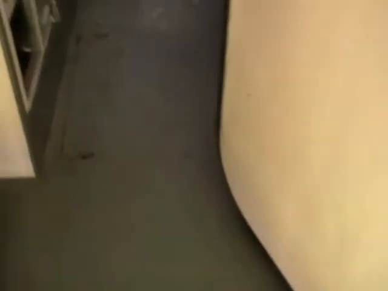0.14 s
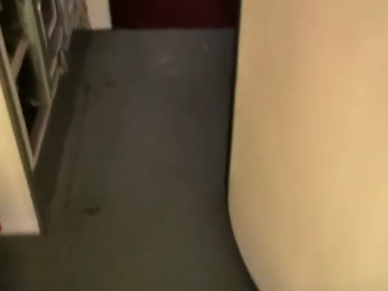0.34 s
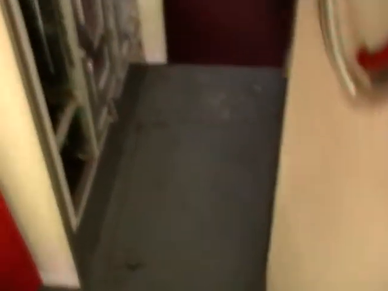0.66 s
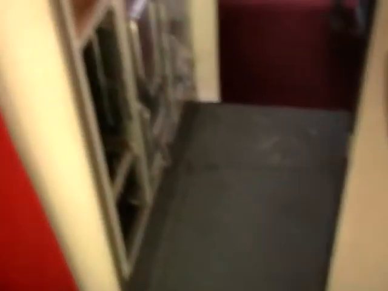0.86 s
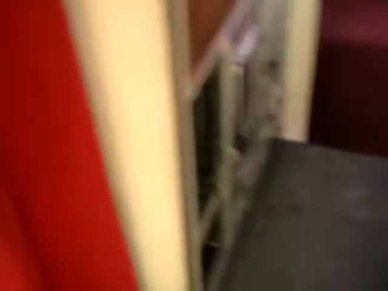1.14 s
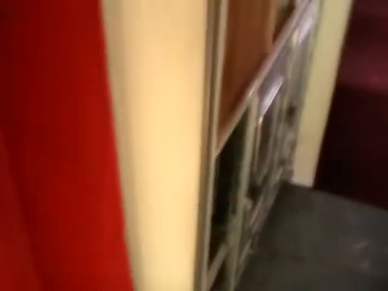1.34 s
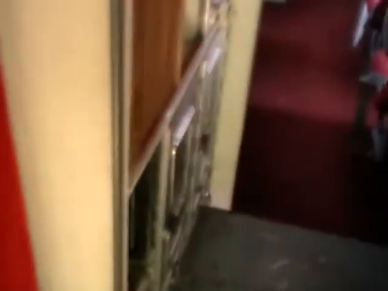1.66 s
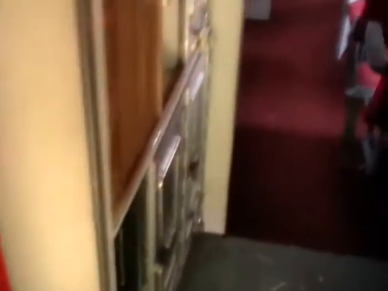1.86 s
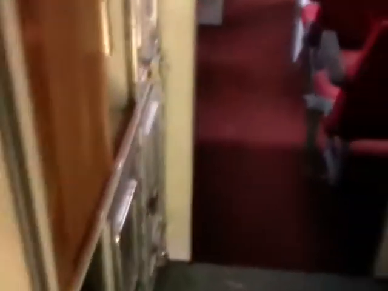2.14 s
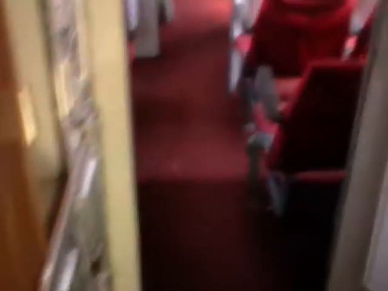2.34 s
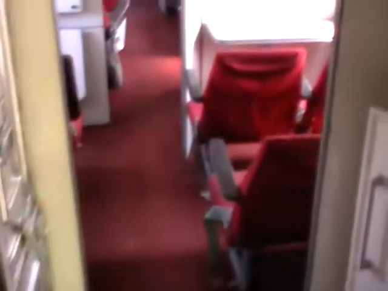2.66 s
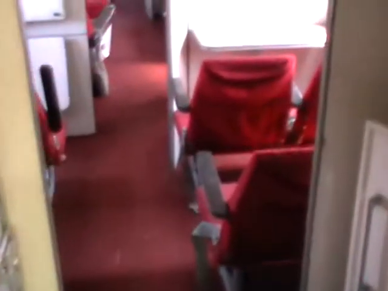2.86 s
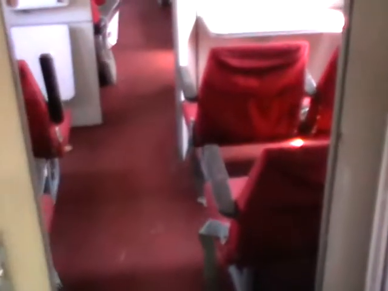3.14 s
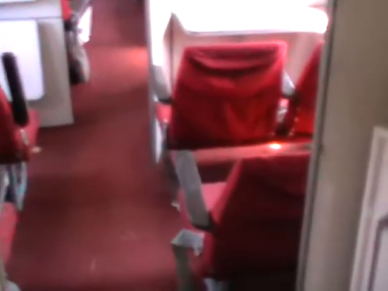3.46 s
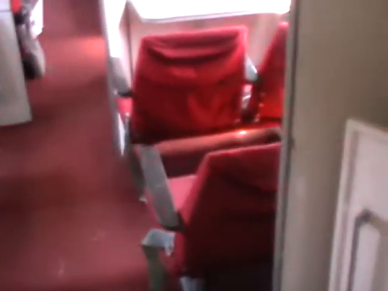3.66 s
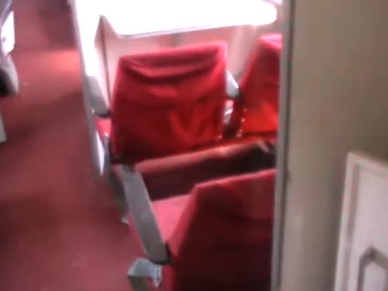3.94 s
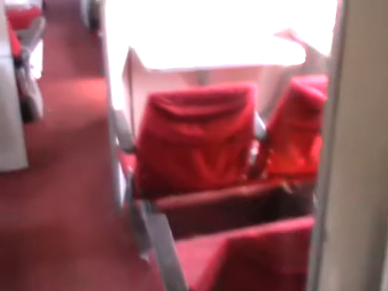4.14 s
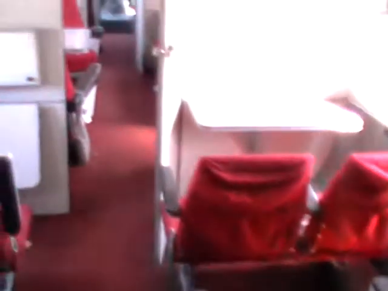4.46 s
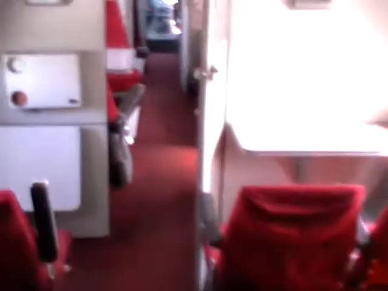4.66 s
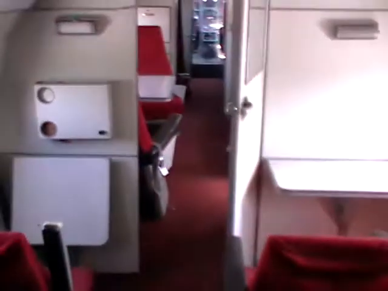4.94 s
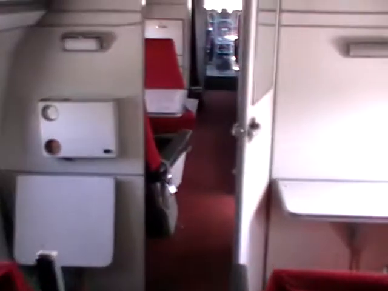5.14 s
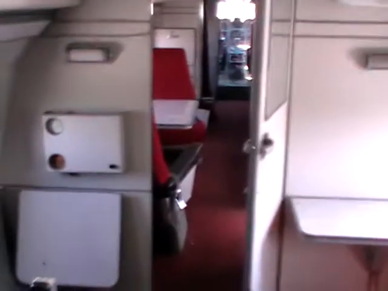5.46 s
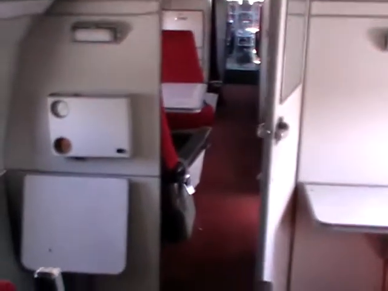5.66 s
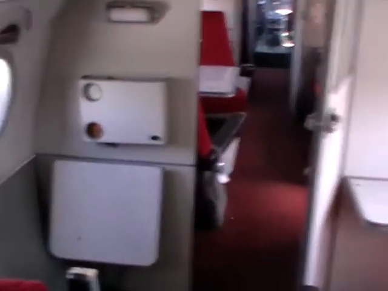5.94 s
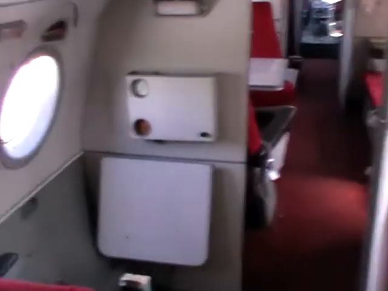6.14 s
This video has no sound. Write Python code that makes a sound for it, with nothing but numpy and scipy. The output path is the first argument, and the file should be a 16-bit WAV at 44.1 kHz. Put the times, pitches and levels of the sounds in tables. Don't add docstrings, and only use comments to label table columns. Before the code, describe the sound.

Someone walks through a small padded aircraft cabin, heels thumping hollow floor panels, one loud metallic bang on a trolley, then soft carpet scuffs and squeaks.

```python
import sys
import numpy as np
from scipy import signal
from scipy.fft import rfft, irfft, next_fast_len
from scipy.io import wavfile
from scipy.ndimage import uniform_filter1d, map_coordinates

SR = 44100
rng = np.random.default_rng(int(sys.argv[2]) if len(sys.argv) > 2 else 0)


def nominal_scale(level):
    x = np.asarray(level, float) / 20
    return 10 ** x


def file_out(sig):
    cols = np.atleast_2d(sig).T
    lim = np.clip(cols, -1, 1)
    pcm = np.round(lim * 32767).astype(np.int16)
    wavfile.write(sys.argv[1], SR, pcm)


N = 278271

# start_s, ring_db, thud_db, clap_db, attack_ms
BLOWS = [(0.318, -8.5, -15, -28, 11.4), (1.0934, -1, -8, -3.5, 1.3), (1.453, -13.5, -20.5, -36, 2.8),
         (2.393, -28, -43.5, -42, 4.5), (2.838, -11, -15, -40.5, 1.2), (2.922, -12, -20.5, -44, 2.2),
         (3.6233, -20.5, -23, -36, 0.7), (4.676, -23.5, -26, -49, 0.97), (5.631, -21, -26.5, -57.5, 0.82),
         (5.692, -33, -34, -39, 3.5), (5.7253, -18.5, -27, -43, 1.4)]
# start_s, ring_db, thud_db,
# clap_db, attack_ms
REBOUNDS = [(.336, -17, -28, -50, 2), (1.468, -29, -38, -50, 2), (2.94, -27, -40, -55, 3.3),
            (3.694, -33, -34, -58, 1.5), (4.878, -33, -43, -60, 2.7), (5.641, -28, -41, -61, 2),
            (1.097, -7, -30, -40, 2), (1.118, -16.5, -30, -28, 9.3), (.352, -24.5, -40, -60, 4),
            (.398, -22, -50, -65, 6), (3.022, -36, -55, -75, 5), (3.062, -33, -55, -69, 4.2),
            (3.118, -34.5, -55, -70, 3.1), (6.5, -41, -55.5, -75, 3.7), (0.73, -31, -43, -65, 5.5)]
# pitch_hz, level_db, t60_s
GALLEY = [(109, -14.5, 0.25), (233.4, 8.5, 0.1), (369.5, -1.5, 0.1), (459, -12, 0.21), (550, 2.5, 0.079),
          (720, -8.5, 0.11), (990, -37.5, .15), (1385, -12, .05), (1150, -22, .05)]
# pitch_hz, level_db, t60_s
TROLLEY = [(60, -20, 0.49), (87, -12.5, 0.7), (112.2, -8.5, 0.33), (151, -14, 0.42), (208, 0, 0.082),
           (232, -4.5, 0.052), (263.3, -6, 0.051), (311, -2.5, .05), (376, -5.5, 0.069),
           (565, -8.5, 0.17), (620.7, 2, 0.09), (788, -7.5, .14), (832, -10, 0.084), (1094, -13.5, 0.1),
          (1190, -11.5, 0.13), (1388, -14, 0.068), (1540, -8, 0.11), (1664, -14, .15), (1760, -5, 0.1),
          (2200, -13, 0.044), (2600, -14.5, 0.05), (3136, -9, 0.055), (3460, -13, 0.039)]
# pitch_hz, level_db, t60_s
PANELS = [GALLEY, TROLLEY, [(205, -1.5, 0.15), (547, -12, 0.29), (720, -24, 0.29), (323, 4, 0.05)],
          [(732, 7, 0.031), (1000, -4, 0.025), (1300, -3, 0.03)], [(150.8, 1, 0.19), (320, -6.5, 0.074),
          (447, -1, 0.046), (560, -6, 0.062), (895, -13.5, 0.06), (1360, -23, 0.19)], [(159.6, 9.5, 0.049),
          (159, -12, 0.22), (550, -16, 0.12), (270, -2.5, 0.095), (1450, -10.5, 0.042), (860, -18, .05),
          (1700, -20, .04)], [(337, 7.5, 0.034), (478, 0.5, 0.073), (560, -11.0, 0.11), (1190, 6.5, 0.021),
          (1470, -2.5, 0.055), (2120, -21, 0.17)] + [(106.0, -9.0, 0.17), (193, -6.5, 0.12)],
          [(96, -2, 0.32), (160.2, -1.5, 0.38), (213, 6, 0.074), (317, 3, 0.099), (410, -3.5, 0.16)],
          [(147, -23.5, 0.43), (460, 7.5, 0.033), (582, -5.5, 0.093), (1100, -7.5, 0.078)], [(560, 5, 0.1),
          (900, -5, 0.05)], [(338, -12, 0.082), (550, 1, 0.036), (833, 1, 0.045), (1294, -7.5, 0.099),
          (1550, -12, 0.087)]]
# pitch_hz, level_db, t60_s
LOOSE_PARTS = [
    [(224.5, -3, .25), (367, -10, 0.14), (600, -10, 0.17)],
    [(208, -1, .09), (424, -11, 0.055)],
    [(165, -4, .15), (300, -7, .1), (505, -8, .1)],
    [(200, -5, 0.13), (426, 3, .05), (704, -4, 0.044)],
    [(130, 2.5, 0.13), (300, -8, .08)],
    [(472, -2, .07), (800, -4, 0.055)],
    [(840, -4, .07), (910, -3, .08), (982, 0, 0.14)],
    [(1193, -3, .14), (1450, 0, .1), (2110, -5, .14), (2410, -8, .12), (3122, -10, .14)],
    [(362, -2, 0.13), (596, 0, .07), (716, -4.5, .15), (956, -14, 0.074)],
    [(230, -5, 0.0545), (330, 4, .05)],
    [(162, 2, .12), (300, -8, .05)],
    [(163, 6, 0.12), (260, -5, 0.07)],
    [(159.6, 1.5, 0.28), (300, -3.5, .06)],
    [(165, -0.5, .2), (486, 1.5, .05)],
    [(273, -1, 0.082), (550, -3, 0.069), (855, -7, .05)],
]
# pitch_hz, skew_radians
PORT_SKEW = [(60, .12), (400, .2), (2000, .3)]
# pitch_hz, left_over_right_db
LEAN = [(100, -1.7), (400, -0.5), (800, 1.9), (1500, 1.5), (3000, 0.5)]
# start_s, peak_db, pitch_hz, t60_ms
CLICKS = [(0.3239, -18, 5700, 20), (0.32, -29, 4700, 176), (1.4585, -38, 4200, 12), (2.313, -38, 2600, 21),
          (2.6025, -35, 745, 6), (2.671, -35, 2350, 30), (2.672, -37.5, 690, 46), (2.754, -44.5, 4500, 20),
          (2.783, -37, 3800, 20), (2.8397, -17, 900, 12), (3.3334, -25, 5500, 8), (3.6428, -25, 4300, 11.5),
          (1.0953, -9.5, 6500, 32), (4.055, -46, 4800, 12), (4.281, -36, 5000, 8.5), (5.128, -44, 4500, 12),
          (5.729, -23, 1100, 26), (1.3493, -30, 5030, 10), (1.41, -21, 3800, 8.6), (3.3982, -32, 2600, 20),
          (3.5912, -37, 5500, 8), (3.696, -31.5, 900, 17)]
# start_s, peak_db, pitch_hz, t60_ms
KNOCKS = [(0.37, -40, 1300, 27), (1.3313, -26.5, 1000, 33), (1.4715, -32, 2000, 45),
          (1.6435, -36, 4800, 28), (2.604, -41, 1710, 39), (2.8425, -25, 2390, 25), (2.185, -28, 800, 30),
          (2.195, -30, 560, 37), (2.411, -37.5, 745, 35), (2.94, -35, 1300, 25), (3.34, -26, 9600, 9),
          (3.3434, -26.5, 8300, 10), (3.3983, -31, 2360, 41), (3.549, -47, 1300, 23),
          (4.678, -25, 1000, 23), (4.6784, -16.5, 400, 8), (5.6323, -31, 1900, 20),
          (5.703, -29.5, 1830, 40), (3.3333, -25, 8700, 10), (3.643, -29, 3800, 12)]
# start_s, low_db, high_db, brightest_hz, t60_ms
DRAGS = [(0.439, -40, -53, 2600, 220), (0.616, -34, -56, 1100, 110), (1.203, -24.5, -38.5, 1030, 47),
         (1.257, -24, -38.5, 2850, 165), (1.725, -33, -53, 2220, 67), (2.115, -45.5, -48, 1550, 96),
         (2.311, -42.5, -65, 1320, 77), (2.818, -31.5, -56, 1500, 99), (2.864, -24.5, -47.5, 2200, 190),
         (2.97, -38.5, -47, 926, 190), (3.044, -33.5, -52, 1840, 195), (3.135, -34, -61, 1740, 120),
         (3.349, -35.5, -47, 1190, 410), (3.791, -33.5, -49, 1830, 120), (3.837, -30, -71, 2616, 150),
         (3.871, -29.5, -49, 2580, 145), (4.643, -30, -54, 1150, 79), (4.759, -36, -43, 2630, 310),
         (4.824, -31, -48.5, 1810, 140), (4.932, -25, -37, 560, 79), (5.02, -34.5, -48.5, 2850, 84),
         (5.074, -44, -47, 1310, 140), (5.705, -27.5, -66, 1000, 250), (5.716, -28.5, -50.5, 2590, 210)]
# start_s, low_db, high_db, brightest_hz, t60_ms
SNAGS = [(1.328, -32, -60, 1100, 60), (1.47, -19, -35.5, 910, 64), (1.598, -29.5, -49, 1840, 175),
         (1.643, -27.5, -39, 1840, 160), (2.166, -28, -44, 1260, 90), (3.333, -51, -40, 1320, 86),
         (3.591, -35.5, -54, 1190, 270), (5.197, -31, -45.5, 1350, 246)]
# start_s, level_db, pitch_hz, length_ms
SQUEAKS = [(.06, -52, 244, 53), (.345, -30, 226, 72), (0.451, -47.5, 2770, 43), (.485, -45, 550, 27),
           (.545, -43, 232, 81), (.59, -55.5, 2130, 49), (.61, -50, 1100, 39), (1.157, -40, 5500, 23),
           (1.345, -42, 4530, 106), (1.339, -45.5, 6040, 45), (1.34, -47, 1530, 55), (1.345, -47, 3200, 85),
           (1.407, -46, 1140, 45), (2.165, -53, 900, 30), (.63, -48, 487, 97), (2.19, -50.5, 200, 78),
           (2.52, -63.5, 1680, 140), (2.777, -51, 1700, 51), (2.858, -42, 2300, 42), (2.868, -50, 3180, 20),
           (2.888, -44.5, 2550, 35), (3.135, -50, 1860, 53), (3.156, -53, 3200, 23),
           (3.225, -51.5, 1770, 49), (3.831, -63, 2600, 87), (3.865, -52.5, 6200, 23), (4.19, -60, 870, 53),
           (4.32, -57, 800, 44), (4.93, -40, 1107, 62), (4.932, -54, 6260, 51), (4.93, -46, 5200, 35),
           (4.942, -35.5, 1114, 18), (5.075, -54.5, 600, 45), (5.194, -52.5, 1294, 52),
           (4.932, -43, 2340, 49), (5.39, -62.5, 560, 78), (5.509, -62.5, 1790, 107),
           (6.201, -64, 307, 120)]
# full_load_s, hull_boom_db, panel_rumble_db, panel_note_hz
LOADS = [(.06, -66, -50, 244), (.44, -55, -39, 290), (.6, -53, -38.5, 225), (.69, -67, -43, 300),
         (1.02, -83, -51, 248.5), (1.2, -32.5, -35.5, 170), (1.354, -38, -38, 198.6),
         (1.5, -38.5, -33.5, 240), (1.72, -53.5, -58, 219.6), (2.04, -53.5, -56, 180.7),
         (2.16, -58.5, -47, 220), (2.42, -60.5, -63.5, 200), (2.99, -46.5, -44.5, 180),
         (3.13, -53, -50.5, 165), (3.39, -69, -55.5, 289.5), (3.7, -49.5, -48.5, 231.6),
         (3.886, -54.5, -53.5, 254.4), (4.034, -55.5, -57, 237.6), (4.7, -54.5, -47, 170),
         (4.77, -53, -65, 179), (4.89, -48, -49, 177.2), (5.12, -53, -57.5, 174.7), (5.78, -64, -62, 205.4),
         (5.95, -62, -54, 169.6)]
# (20 dB each, sign ignored)
SWINGS = [(.06, -55, -51.5, 7, 0.5), (.455, -51, -51.5, -0.5, 0.27), (.624, -52, -57, 0.2, 0.04),
          (.93, -53.5, -51, 0.45, 0.5), (1.2, -37.5, -50.5, -0.14, 0.08), (1.265, -47, -42.5, 0.25, 0.03),
          (1.364, -39, -38.5, 0.07, 0.22), (1.45, -42, -51, -0.04, 0.11), (1.669, -45.5, -45.5, 0, 0.21),
          (1.76, -60, -63, -1, 0.5), (2.13, -52.5, -55.5, 0.26, 0.64), (2.803, -51, -54, 0.24, 0.15),
          (3.2, -55, -57, 0.5, 0.5), (3.384, -49, -57, 0.31, 0.2), (3.784, -51.5, -52, 0.07, 0.1),
          (3.886, -51, -56.5, 0.33, 0.48), (4.033, -52, -56.5, 0.2, 0.2), (4.5, -51, -51.5, .5, 0.5),
          (4.759, -42.5, -50, 0.22, 0.08), (4.951, -37, -37.5, 0.0443, 0.046),
          (5.06, -51.5, -55.5, 0.45, 0.21), (5.224, -47.5, -56, 0.15, 0.06), (5.44, -59.5, -60, 0.2, 0.8),
          (5.87, -61, -60, 0.5, 0.4)]
# boom_db, rumble_db, carpet_db, cloth_db
STILL_DB = (-75, -70, -67.5, -76)
# frequency_hz, density_db
BOOM = [(15, -50), (25, -17.5), (75, -1.5), (114, 0.5), (140, -1), (160, 0.5), (210, -29.5), (350, -120)]
# frequency_hz, density_db
RUMBLE = [(60, -39.5), (120, -6.5), (200, -5.5), (450, -5), (650, -12.5), (1000, -27.5), (2000, -69.5)]
# frequency_hz, density_db
CARPET = [(150, -34), (250, -4.5), (565, -1), (854, -2), (1040, -2), (1790, -3), (1980, -7.5), (5000, -20),
          (6500, -46), (11000, -120)]
# frequency_hz, density_db
CLOTH = [(1180, -28), (2000, -2), (4970, -3.5), (9110, -10), (13100, -22.5), (13800, -35), (14200, -54),
         (15900, -69)]
# frequency_hz, likeness (1 is identical)
ALIKE = [(60, 1), (180, 1), (550, 0.9), (1650, 0.82), (4000, .8), (7500, .94), (10000, 0.53), (13000, .1)]
# frequency_hz, t60_s
CABIN = [(100, .3), (1000, 0.38), (8000, 0.032)]
# lowest_hz, highest_hz
PORTS = (50, 11000)
# frequency_hz, density_db
HISS_MID = [(15, -67), (25, -26.5), (53, -3), (113, -6.5), (149, -3), (248, -28), (501, -8.5), (4580, -20),
            (6510, -18), (12400, -28), (15900, -60.5)]
# frequency_hz, density_db
HISS_SIDE = [(15, -40), (25, -15.5), (140, -4.5), (350, -8), (600, -11), (1300, -16.5), (4000, -27.5),
             (7500, -37.5), (11500, -36), (13500, -40.5), (15900, -63.5)]
# pitch_hz, rms_db
WHINE = [(12000, -81.5), (10500, -89.5), (9040, -91)]

TICK_DB = -14.5
WAVER, WAVER_RATE = .012, 150
CLICK_SPREAD, KNOCK_SPREAD = 1, 0.29
DRAG_SWELL_MS, SNAG_SWELL_MS = 13, 1.4
RUBBER_FROM_HZ, RUBBER_TOP_HZ = 1105, 1500
RUBBER_DB, FABRIC_DB = -2.5, -31
CHATTER, CHATTER_HZ = 1.6, 320
LOAD_RISE_S, LOAD_FALL_S = .11, 0.15
ROUNDING = 1.185


def blows():
    out = np.zeros((2, N + SR))
    t = np.arange(SR * 3 // 5) / SR
    short = t[:SR // 5]
    for row, modes in zip(BLOWS + REBOUNDS, PANELS + LOOSE_PARTS):
        start_s, ring_db, thud_db, clap_db, attack_ms = row
        at = round((start_s + .0012) * SR)
        ring = -ringing(modes, t)
        thud = puff(short, band(350, 600), 0.18)
        clap = puff(short, band(1250, 1700), 0.081)
        clap += 0.49 * puff(short, band(3000, 2200), 0.055)
        clap += .08 * puff(short, band(2400, 1600), 0.2)
        clap += .2 * puff(short, band(1300, 1300), 0.23)
        tick = puff(short, band(6000, 7000), 0.039)
        noise = nominal_scale(thud_db - 9.0) * thud + nominal_scale(clap_db - 4.0) * clap + nominal_scale(clap_db + TICK_DB) * tick
        onset = 1 - np.exp(-t / (attack_ms / 1000 + 1e-4))
        out[:, at:][:, :len(t)] += onset * nominal_scale(ring_db - 4.5) * ring
        out[:, at:][:, :len(short)] += onset[:len(short)] * noise
    return out[:, :N]


def ringing(modes, t):
    hz, db, t60 = (column[:, None] for column in np.transpose(modes))
    knots = rng.standard_normal((len(modes), 128))
    stray = np.array([np.interp(t * WAVER_RATE, np.arange(len(row)), row) for row in knots])
    phase = 2 * np.pi * hz * (t + WAVER * np.cumsum(stray, axis=1) / SR)
    skew = along(PORT_SKEW, hz) * np.sign(knots[:, -1:]) / 2
    lean_db = along(LEAN, hz) / 2
    gain = nominal_scale(db - 60 * t / np.clip(t60, .02, .6))
    ports = [nominal_scale(side * lean_db) * gain * np.sin(phase + side * skew) for side in (1, -1)]
    return np.sum(ports, axis=1)


def clicks():
    out = np.zeros((2, N + SR))
    t = np.arange(SR // 10) / SR
    taps = [(*row, CLICK_SPREAD) for row in CLICKS] + [(*row, KNOCK_SPREAD) for row in KNOCKS]
    for start_s, peak_db, hz, t60_ms, spread in taps:
        colour = band(hz, spread * hz)
        pulse = filtered(1. * (t == 0), lambda f: colour(f) ** 2)
        pulse = pulse / np.max(np.abs(pulse))
        fizz = puff(t, colour, t60_ms / 1000)
        out[:, round(start_s * SR):][:, :len(t)] += nominal_scale(peak_db - 8.0) * (fizz + 0.91 * pulse)
    return out[:, :N]


def scuffs():
    out = np.zeros((2, N + SR))
    t = np.arange(SR // 5) / SR
    strokes = [(*row, DRAG_SWELL_MS) for row in DRAGS] + [(*row, SNAG_SWELL_MS) for row in SNAGS]
    for start_s, low_db, high_db, hz, t60_ms, swell_ms in strokes:
        low = puff(t, band(hz, 0.29 * hz), 8.1) * 0.73 + puff(t, band(1240, 2060), 9)
        high = puff(t, band(4900, 6600), 12)
        swell_s = swell_ms / 1000 + 1e-4
        rise = np.sin(np.pi / 2 * t / swell_s) ** 2
        fall = nominal_scale(-60000 * (t - swell_s) / t60_ms)
        stroke = np.where(t < swell_s, rise, fall)
        noise = nominal_scale(low_db - 14.0) * low + nominal_scale(high_db - 3.0) * high
        out[:, round((start_s - .4 * swell_s) * SR):][:, :len(t)] += stroke * noise
    return out[:, :N] * nominal_scale(1.8 * wobble(250))


def squeaks():
    out = np.zeros((2, N + SR))
    for start_s, level_db, hz, length_ms in SQUEAKS:
        overtones_db = RUBBER_DB if RUBBER_FROM_HZ < hz < RUBBER_TOP_HZ else FABRIC_DB
        t = np.arange(round(length_ms * SR / 1000)) / SR
        note = puff(t, band(hz, 30 + 0.027 * hz + .00001 * hz ** 2), 12)
        overtones = puff(t, band(2.07 * hz, 0.25 * hz), 10)
        overtones += 0.59 * puff(t, band(min(2.97 * hz, SR / 3), 0.5 * hz), 7.3)
        note += nominal_scale(overtones_db) * overtones
        for _ in range(2):
            uneven_db = 24 * uniform_filter1d(rng.standard_normal(len(t)), size=40)
            slips = np.cumsum(CHATTER_HZ * nominal_scale(uneven_db)) / SR
            note *= unit(1 + CHATTER * (hz > RUBBER_TOP_HZ) * (.5 - slips % 1))
        swell = np.sin(np.pi * (t / t[-1]) ** 0.62) ** 0.41
        out[:, round(start_s * SR):][:, :len(t)] += nominal_scale(level_db) * swell * note
    return out[:, :N]


def puff(t, response, t60):
    return unit(filtered(pair(len(t)), lambda f: response(f) ** 2)) * nominal_scale(-60 * t / t60)


def footfall_rumble():
    full_load_s, boom_db, rumble_db, note_hz = np.transpose(LOADS)
    boom_gain = swells(full_load_s, boom_db, LOAD_RISE_S, LOAD_FALL_S, STILL_DB[0])
    rumble_gain = swells(full_load_s, rumble_db, LOAD_RISE_S, LOAD_FALL_S, STILL_DB[1])
    boom = unit(filtered(pair(N), lambda hz: nominal_scale(along(BOOM, hz))))
    note_now = np.interp(np.arange(N) / SR, full_load_s, note_hz)
    return boom_gain * boom + rumble_gain * panel(note_now, width_hz=25, note_db=7.5)


def panel(note_hz, width_hz, note_db):
    hz, t, z = signal.stft(pair(N), SR, nperseg=2048)
    under = note_hz[np.minimum((t * SR).astype(int), N - 1)]
    lift = 1 + nominal_scale(note_db) / (1 + ((hz[:, None] - under) / width_hz) ** 2)
    colour = nominal_scale(along(RUMBLE, hz))[:, None]
    return unit(signal.istft(z * lift * colour, SR, nperseg=2048)[1][:, :N])


def brushing():
    fastest_s, carpet_db, cloth_db, rise_s, fall_s = np.transpose(SWINGS)
    carpet_gain = swells(fastest_s, carpet_db, rise_s, fall_s, STILL_DB[2])
    cloth_gain = swells(fastest_s, cloth_db, rise_s, fall_s, STILL_DB[3])
    stir = wobble(25.04)
    carpet = friction(CARPET, patchy_db=2.5, grain_db=1.0, grain_rate=170)
    cloth = friction(CLOTH, patchy_db=2.0, grain_db=1.15, grain_rate=330)
    rub = carpet_gain * nominal_scale(0.92 * stir) * carpet + cloth_gain * nominal_scale(1.0 * stir) * cloth
    return rub * nominal_scale([[.6], [-.6]])


def friction(spectrum, patchy_db, grain_db, grain_rate):
    z = signal.stft(pair(N) * nominal_scale(grain_db * wobble(grain_rate)), nperseg=512)[2]
    field = uniform_filter1d(rng.standard_normal(z.shape[1:]), size=5, axis=0)
    field = uniform_filter1d(field, size=7, axis=1)
    x = signal.istft(z * nominal_scale(patchy_db * unit(field)), nperseg=512)[1][:, :N]
    return unit(filtered(x, lambda hz: nominal_scale(along(spectrum, hz))))


def swells(s, db, rise_s, fall_s, still_db):
    t = np.arange(0, N, 64) / SR - s[:, None]
    before = -t / np.reshape(np.abs(rise_s), (-1, 1))
    after = t / np.reshape(np.abs(fall_s), (-1, 1))
    away = np.maximum(before, after)
    power = np.sum(nominal_scale(db[:, None] - 20 * away ** ROUNDING) ** 2, axis=0) + nominal_scale(still_db) ** 2
    return np.repeat(np.sqrt(power), 64)[:N]


def cabin(x):
    hz, t, z = signal.stft(rng.standard_normal((2, SR // 3)), SR, nperseg=256)
    decay = nominal_scale(-60 * t / along(CABIN, hz)[:, None])
    tail = signal.istft(z * decay, SR, nperseg=256)[1]
    late = np.pad(x, ((0, 0), (200, 0)))
    return signal.fftconvolve(late, tail / np.linalg.norm(tail[0]), axes=1)[:, :N]


def through_ports(x):
    low_hz, high_hz = PORTS

    def response(f):
        bass_cut = (1j * f / (low_hz + 1j * f)) ** 3
        return bass_cut / (1 + 1.2j * f / high_hz - (f / high_hz) ** 2) ** 2

    return filtered(x, response)


def port_hiss():
    noise = rng.standard_normal((2, N))
    mid = nominal_scale(-63.5) * unit(filtered(noise[0], lambda hz: nominal_scale(along(HISS_MID, hz))))
    side = nominal_scale(-58) * unit(filtered(noise[1], lambda hz: nominal_scale(along(HISS_SIDE, hz))))
    return np.array([mid + side, mid - side])


def whine():
    t = np.arange(N) / SR
    return sum(nominal_scale(db + 5) * np.sin(2 * np.pi * hz * t) for hz, db in WHINE)


def pair(length):
    def split(hz):
        turn = np.arccos(np.clip(along(ALIKE, hz), -1, 1)) / 2
        return np.array([np.cos(turn), np.sin(turn)])

    mid, side = filtered(rng.standard_normal((2, length)), split)
    return np.array([mid + side, mid - side])


def band(centre_hz, width_hz):
    return lambda f: 1j * f * width_hz / (centre_hz ** 2 - f * f + 1j * f * width_hz)


def filtered(x, response):
    n = x.shape[-1]
    m = next_fast_len(n + 2048)
    return irfft(rfft(x, m) * response(np.fft.rfftfreq(m, 1 / SR)), m)[..., :n]


def wobble(rate):
    knots = rng.standard_normal(int(N * rate / SR) + 4)
    return map_coordinates(knots, [np.arange(N) * rate / SR])


def along(points, hz):
    f, v = np.transpose(points)
    return np.interp(np.log(hz + 1), np.log(f + 1), v)


def unit(x):
    return x / np.sqrt(np.mean(x ** 2) + 1e-20)


def scene():
    hard = blows() + clicks()
    touches = hard + nominal_scale(-22.5) * cabin(hard) + scuffs() + squeaks()
    return through_ports(touches) + footfall_rumble() + brushing()


def top_cut(x):
    return signal.sosfilt(signal.butter(12, 16010, fs=SR, output="sos"), x)


def record(dry):
    x = dry + port_hiss() + whine()
    x = filtered(x, lambda hz: nominal_scale(-32 * np.clip((hz - 12800) / 1200, 0, 1)))
    mix = x / (1 + np.abs(x / .93) ** 6) ** (1 / 6)
    return top_cut(mix)


dry = scene()
out = record(dry)
file_out(out)
```